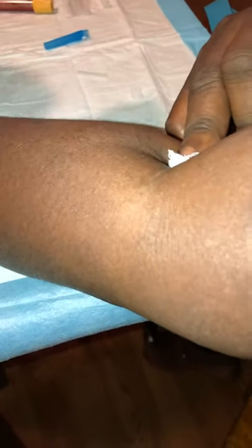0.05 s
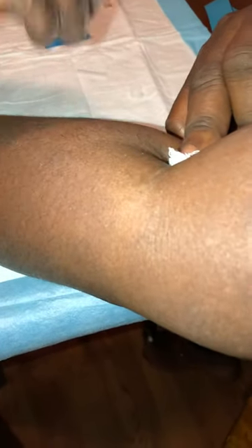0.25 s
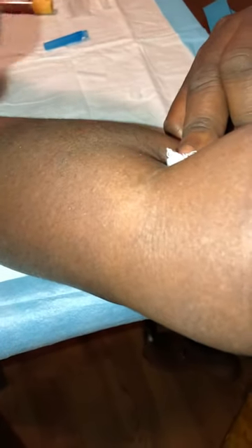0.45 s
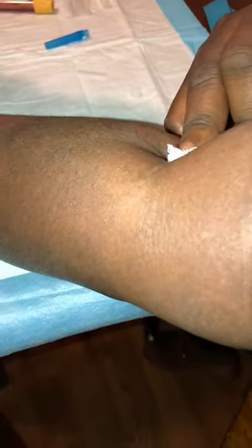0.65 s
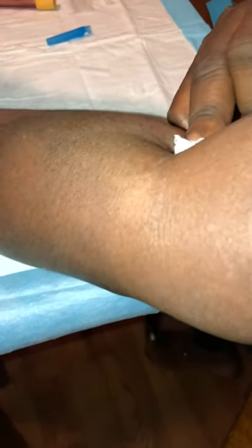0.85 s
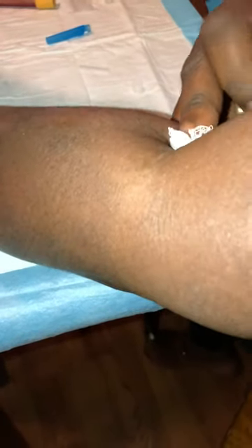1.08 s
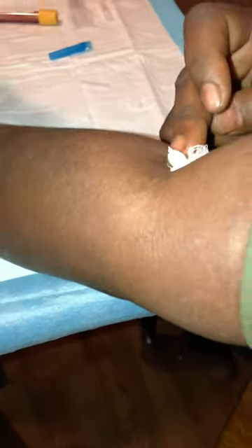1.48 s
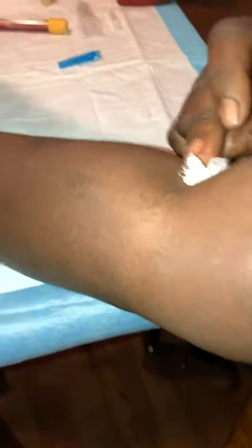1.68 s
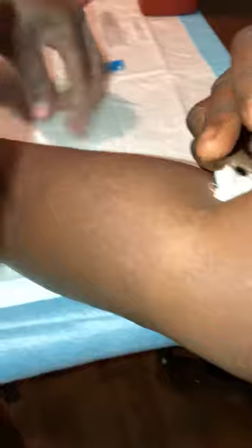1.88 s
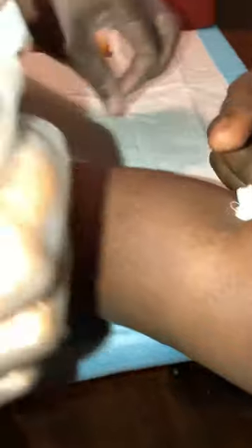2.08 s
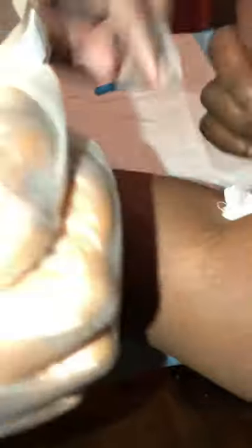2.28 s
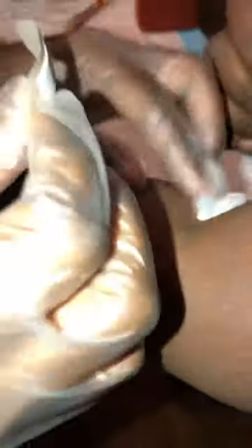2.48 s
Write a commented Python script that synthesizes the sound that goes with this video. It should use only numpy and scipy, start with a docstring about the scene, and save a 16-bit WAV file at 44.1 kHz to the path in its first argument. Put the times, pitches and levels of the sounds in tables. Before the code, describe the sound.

A small plastic item clicks onto a table, followed by faint paper and glove rustling.

```python
"""A plastic item is put down on a table in a small room: it chatters and lands with a sharp click, each
impact exciting the modes of its body. Close by, paper and gloves rustle by friction and snap as their
creases buckle, and something tiny clinks. Reflections from the table and the room follow these sounds.
Beneath them the room rumbles, and a low drone, probably an engine outdoors, climbs slowly in pitch
among faint hums."""
import sys
import numpy as np
from scipy import signal
from scipy.fft import rfft, irfft, next_fast_len
from scipy.io import wavfile
from scipy.ndimage import uniform_filter1d

SR = 44100
rng = np.random.default_rng(int(sys.argv[2]) if len(sys.argv) > 2 else 0)


def persist_wave(psi):
    """Save psi, clipped to +-1, as 16-bit WAV."""
    counts = np.round(np.clip(psi, -1, 1) * 32767).astype(np.int16)
    wavfile.write(sys.argv[1], SR, np.atleast_2d(counts).T)


N = 116865

# spectra of the deep rumble, the room rumble and the air noise: f/Hz, relative density/dB
DEEP_SPECTRUM = [(15, -25), (30, -14), (45, -6), (70, 4.5), (100, -10), (200, -44)]
RUMBLE_SPECTRUM = [(20, -24.5), (45, -14.5), (70, -2), (140, 3.5), (220, -1), (300, -11.5), (450, -20),
                   (900, -52)]
AIR_SPECTRUM = [(150, -31), (250, -2), (319, -2), (400, -11), (519, -6.5), (651, -12.5), (1310, -23.5),
                (4570, -33), (15200, -43.5), (16000, -61)]
# envelopes of the two rumbles and the clearest hum: t/s, level/dB
DEEP_ENVELOPE = [(0, -64), (1.15, -77), (1.3, -62.5), (1.8, -64.5), (2.1, -59), (2.45, -61.5), (2.65, -53)]
RUMBLE_ENVELOPE = [(0, -55.5), (1.1, -55.5), (1.35, -55.5), (1.6, -50.5), (1.85, -53), (2.4, -56),
                   (2.65, -53.5)]
HUM_ENVELOPE = [(0, -62), (0.25, -67), (0.36, -55), (0.58, -57.5), (0.8, -63), (1.25, -65), (1.45, -59),
                (1.75, -62), (2.1, -70.5), (2.45, -62.5), (2.65, -59)]
# faint narrow-band hums: f/Hz, resonator bandwidth/Hz, level/dB
HUM_BANDS = [(199.6, 14, -63), (224.5, 16, -66), (456, 30, -73.5), (513.2, 16, -68.5), (582, 24, -74.5),
             (843, 8, -77.5)]
# course of the engine: t/s, firing rate/Hz, firing tone level/dB, shaft harmonics level/dB
ENGINE_COURSE = [(0, 87.4, -51, -64), (0.55, 88.2, -47.5, -65), (0.8, 91, -45, -69),
                 (1.15, 94.96, -44.5, -73), (1.23, 106, -50.5, -66), (1.35, 111.6, -45, -52),
                 (1.5, 113.7, -43.5, -63), (1.57, 111.5, -50, -57.5), (1.73, 107.3, -60, -68),
                 (1.82, 108.6, -50.5, -71), (1.9, 113.3, -41.5, -57), (2.05, 120.8, -46, -49.5),
                 (2.2, 121.9, -45, -56), (2.4, 122.1, -43, -58), (2.56, 124.9, -55.5, -55.5),
                 (2.65, 127.5, -54, -56)]
# shaft harmonics: multiple of the shaft rate, relative level/dB
SHAFT_HARMONICS = [(2, -0.5), (4, -1.5), (5, -7.5), (8, -12.5)]
# bands of the reverberant tail: f/Hz, T60/s, gain/dB
REVERB_BANDS = [(500, .4, -36), (1500, .36, -12), (3500, 0.48, -13), (4600, 0.44, -13), (5800, 0.35, -15.5),
                (8000, .3, -19), (14000, 0.3, -17)]
# strokes over paper and glove: t/s, duration/s, level/dB, tilt/(dB per octave)
RUSTLE_STROKES = [(0.000, 0.037, -71.5, 0), (0.060, 0.083, -69.5, 0), (0.113, 0.095, -54.5, 1),
                  (0.348, 0.14, -70, 1), (0.498, 0.078, -64, 0), (0.567, 0.062, -61, -0.5),
                  (0.630, 0.032, -59, -1.5), (0.808, 0.011, -64, 3.5), (0.969, 0.038, -68, -2),
                  (1.067, 0.14, -68.5, 2.5), (1.502, .06, -61, -1), (1.569, .018, -55, 2),
                  (1.589, 0.12, -68, 6.5), (1.72, 0.045, -54, 10.5), (1.753, 0.024, -51.5, 1),
                  (1.792, .04, -65, -3), (1.864, 0.036, -57.5, 4.5), (1.943, 0.024, -57, 6.5),
                  (1.988, 0.1, -70.5, 2), (2.162, 0.021, -58, 1), (2.237, 0.16, -68.5, 5.5),
                  (2.452, 0.019, -58.5, -3.5), (2.476, .06, -67, -4)]
# spectrum of the friction noise: f/Hz, relative level/dB
RUSTLE_SPECTRUM = [(300, 8), (900, 1.5), (2000, 0), (4200, 2.5), (7000, -0.5), (11000, -7), (16000, -5.5)]
# light impacts of the tiny part, short when fingers damp it: t/s, level/dB, T60/s
CLINK_IMPACTS = [(0.17, -54.5, .05), (1.304, -59.5, .04), (1.962, -55, .03), (2.3060, -60, .04),
                 (2.319, -51, 0.034), (2.3235, -48.5, 0.072), (2.334, -56, 0.04), (2.5610, -47.5, 0.069)]
# its modes: f/Hz, relative level/dB, fraction of the impact's T60
TINY_PART_MODES = [(7060, -17, .4), (10470, -3, 1), (12410, -2, .9), (15660, -5, .7)]
# snaps of paper and gloves: t/s, level/dB, centre f/Hz, T60/s
CREASE_SNAPS = [(0.0657, -50, 4960, 0.0044), (0.0965, -64, 7000, .004), (0.1393, -44, 6140, 0.0067),
                (0.1408, -43.5, 5000, .006), (0.1705, -49, 8100, .004), (0.58, -46.5, 3250, .008),
                (0.8760, -56.5, 1700, 0.011), (0.9860, -58, 4000, .008), (1.1055, -48, 14100, 0.015),
                (1.165, -59, 8900, 0.0061), (1.1782, -51.5, 7360, .006), (1.2917, -56.5, 9970, .005),
                (1.3020, -55, 9000, 0.0057), (1.5774, -46.5, 11200, 0.0087), (1.5985, -50, 11000, .004),
                (1.6223, -38.5, 4340, 0.011), (1.6555, -62, 12000, .004), (1.6947, -53, 5500, 0.011),
                (1.7249, -32, 12000, .010), (1.7275, -47, 3530, 0.0085), (1.764, -47, 10050, .005),
                (1.7797, -30, 12900, 0.0082), (1.7859, -31.5, 12200, 0.0065), (1.7871, -29.5, 8900, 0.012),
                (1.949, -53, 12000, 0.0058), (1.9540, -55.5, 1960, 0.0089), (2.0014, -52.5, 7360, 0.0084),
                (2.0667, -55.5, 8000, 0.0081), (2.043, -59, 7490, 0.0058), (2.1020, -57.5, 6500, .005),
                (2.1369, -54.5, 7870, .005), (2.1404, -53.5, 11000, 0.0062), (2.2586, -51, 7400, 0.012),
                (2.3553, -53.5, 4470, .005), (2.3695, -52.5, 8000, 0.02), (2.4420, -59.5, 8800, 0.012),
                (2.5430, -54, 5000, 0.0031)]
# soft pitched pops: t/s, level/dB, f/Hz
SOFT_POPS = [(1.6226, -46.5, 2380), (1.7800, -42.5, 2870), (1.7865, -44.5, 885), (1.7875, -51, 1690),
             (2.1528, -48.5, 1450), (2.2945, -55, 2490), (2.3050, -51.5, 4040), (2.3688, -55.5, 1570),
             (2.4625, -55, 3450)]
# the item meets the table: t/s, ring level/dB, crack level/dB, crack tilt/(dB per octave)
PLASTIC_IMPACTS = [(0.2015, -25.5, -28.5, 3), (0.2076, -34, -32, .5), (0.214, -40, -41, 2),
                   (0.2317, -13.5, -20, 0)]
# spectra of its body (peaks near 4.5 and 5 kHz) and of the contact crack: f/Hz, relative level/dB
BODY_SPECTRUM = [(500, -40.5), (2000, -29), (2650, -27.5), (3150, -9), (4000, -4.5), (4480, 4.5),
                 (4750, -6), (5000, 1), (5750, -13.5), (6850, -29.5), (7500, -11.5), (9000, -17),
                 (11800, -22.5), (14700, -20)]
CRACK_SPECTRUM = [(200, 3), (550, 3.5), (850, 8.5), (1400, 2), (2200, -4.5), (4000, 7), (8000, 2.5),
                  (11000, 0.5), (16000, -1)]

TOP_HZ = 16300


def undb(db):
    """Amplitude grows tenfold for every 20 dB."""
    return 10 ** (np.asarray(db) / 20)


def unit(x):
    """Normalisation to an rms of 1."""
    return x / np.sqrt(np.mean(x ** 2) + 1e-30)


def burst(x, db):
    """Energy normalisation: a transient gets the energy of one millisecond at this level."""
    return x * undb(db) * np.sqrt(SR / 1000 / np.sum(x ** 2))


def seconds(length):
    """Uniformly sampled time."""
    return np.arange(int(length * SR)) / SR


def fade(t, t60):
    """Exponential damping: 60 dB in t60 seconds."""
    return np.exp(-np.log(1000) * t / t60)


def noise_decay(t, t60):
    """White noise under exponential damping."""
    return rng.standard_normal(len(t)) * fade(t, t60)


def contour(points):
    """Amplitude envelope, linear in decibels between (t/s, level/dB) points."""
    return undb(np.interp(np.arange(N) / SR, *np.array(points).T))


def add(out, at, x):
    """Superposition of a sound starting at a given time."""
    i = max(int(round(at * SR)), 0)
    out[i:i + len(x)] += x[:max(len(out) - i, 0)]


def colour(x, points, tilt_db=0):
    """Minimum-phase filter through (f/Hz, level/dB) points, tilted per octave above about 1 kHz."""
    size = 2 * next_fast_len(len(x))
    octave = np.log2(np.maximum(np.fft.rfftfreq(size, 1 / SR), 10))
    hz, db = np.array(points, float).T
    gain = undb(np.interp(octave, np.log2(hz), db) + tilt_db * np.maximum(octave - 10, 0))
    cepstrum = irfft(np.log(gain))
    cepstrum[1:size // 2] *= 2  # folding the cepstrum makes the filter causal
    cepstrum[size // 2 + 1:] = 0
    return irfft(rfft(x, size) * np.exp(rfft(cepstrum)))[:len(x)]


def low_cut(x, hz):
    """Second-order high-pass filter."""
    return signal.sosfilt(signal.butter(2, hz, "high", fs=SR, output="sos"), x)


def resonate(x, hz, width):
    """Two-pole resonance with Q = hz / width."""
    return signal.lfilter(*signal.iirpeak(hz, hz / width, fs=SR), x)


def wander(rate):
    """Random modulation: ramps between `rate` values a second, with a spread near 1."""
    hold = int(SR / rate)
    steps = np.repeat(rng.standard_normal(N // hold + 3), hold)
    return 1.2 * uniform_filter1d(steps, hold)[int(rng.random() * hold):][:N]


def rumble(spectrum, envelope):
    """Amplitude modulation: low-frequency noise slowly swells and sinks."""
    return contour(envelope) * unit(colour(rng.standard_normal(N), spectrum))


def air():
    """Stationary broadband noise, weak in the treble."""
    noise = colour(rng.standard_normal(N), AIR_SPECTRUM)
    return undb(-59) * unit(low_cut(noise, hz=220))


def hums():
    """Narrow resonances give noise a pitch; one clearer tone wavers by frequency modulation."""
    faint = np.zeros(N)
    for hz, width, db in HUM_BANDS:
        band = resonate(rng.standard_normal(N), hz, width)
        faint += undb(db) * unit(resonate(band, hz, width))
    clear_hz = 319 * (1 + .009 * wander(rate=14))
    phase = 2 * np.pi * np.cumsum(clear_hz) / SR
    return faint + np.sqrt(2) * contour(HUM_ENVELOPE) * np.sin(phase)


def engine_drone():
    """Periodic excitation heard through walls: three firings to a turn, plus harmonics of the shaft."""
    times, *columns = np.array(ENGINE_COURSE).T
    hz, firing_db, shaft_db = (np.interp(np.arange(N) / SR, times, column) for column in columns)
    firing_phase = 2 * np.pi * np.cumsum(hz) / SR
    shaft_phase = firing_phase / 3
    harmonics = sum(undb(db) * np.sin(order * shaft_phase + rng.uniform(0, 2 * np.pi))
                    for order, db in SHAFT_HARMONICS)
    return np.sqrt(2) * (undb(firing_db) * np.sin(firing_phase) + undb(shaft_db) * harmonics)


def reverberation(x):
    """Reflection: early returns from nearby surfaces, then a diffuse tail that dies sooner in the treble."""
    t = seconds(.6)
    spectrum = rfft(rng.standard_normal(len(t)))
    log_hz = np.log(np.fft.rfftfreq(len(t), 1 / SR) + 1)
    centres = np.log([row[0] for row in REVERB_BANDS])
    decay = lambda t60: fade(t, t60) / np.linalg.norm(fade(t, t60))
    response = undb(-14) * rng.standard_normal(len(t)) * decay(t60=.095)  # early reflections
    for weights, (_, t60, db) in zip(np.eye(len(centres)), REVERB_BANDS):
        band = irfft(spectrum * np.interp(log_hz, centres, weights), len(t))
        response += undb(db) * decay(t60) * band
    out = np.zeros(N)
    add(out, at=.005, x=signal.fftconvolve(x, response))
    return out


def grains(per_s):
    """Shot noise: tiny clicks of uneven size at random times."""
    size = undb(3.6 * np.minimum(rng.exponential(size=N), 5))
    occurs = rng.random(N) < per_s / SR
    return unit(occurs * size * rng.choice([-1, 1], N))


def flicker(x, bands=20, depth_db=5.5):
    """Independent modulation of each narrow band, as the contact moves over the folds."""
    size = next_fast_len(N)
    spectrum = rfft(x, size)
    root_hz = np.sqrt(np.fft.rfftfreq(size, 1 / SR))
    centres = np.linspace(np.sqrt(500), np.sqrt(TOP_HZ), bands)
    out = np.zeros(N)
    for weights in np.eye(bands):
        band = irfft(spectrum * np.interp(root_hz, centres, weights), size)[:N]
        out += band * undb(depth_db * np.minimum(wander(rate=50), 1))
    return unit(out)


def rustles(rub_share=.6, release_s=.013):
    """Friction on paper and glove: each stroke mixes grains of creasing with smooth rubbing."""
    creasing = np.sqrt(1 - rub_share) * grains(per_s=1500)
    rubbing = np.sqrt(rub_share) * rng.standard_normal(N)
    friction = flicker(creasing + rubbing)
    out = undb(-76.5) * unit(colour(grains(per_s=300), RUSTLE_SPECTRUM, tilt_db=-3))  # constant creasing
    for at, length, db, tilt_db in RUSTLE_STROKES:
        stroke = friction[int(at * SR):][:int((length + .1) * SR)]
        t = np.arange(len(stroke)) / SR
        rise = np.minimum(t / (.003 + .19 * length), 1)
        release = np.exp(-np.maximum(t - length, 0) / release_s)
        add(out, at, undb(db) * rise * release * unit(colour(stroke, RUSTLE_SPECTRUM, tilt_db)))
    return out


def clinks():
    """Free vibration: a tiny hard part scrapes and rings in high, damped modes."""
    out, t = np.zeros(N), seconds(.15)
    for at, db, t60 in CLINK_IMPACTS:
        scrape = resonate(noise_decay(t, t60=.02), hz=11000, width=7000)
        ring = sum(undb(mode_db) * fade(t, share * t60) * np.cos(2 * np.pi * hz * t)
                   for hz, mode_db, share in TINY_PART_MODES)
        add(out, at, undb(db) * (ring + burst(scrape, db=-4)))
    return out


def pops():
    """Damped oscillation at a single frequency makes each soft pop."""
    out, t = np.zeros(N), seconds(.04)
    for at, db, hz in SOFT_POPS:
        add(out, at, burst(np.sin(2 * np.pi * hz * t) * fade(t, t60=.018), db))
    return out


def snaps():
    """Buckling of a crease: milliseconds of crackle in a broad resonance with a narrower ring inside."""
    out, t = np.zeros(N), seconds(.04)
    for at, db, hz, t60 in CREASE_SNAPS:
        crackle = resonate(noise_decay(t, t60), hz, width=.73 * hz)
        ring = undb(-1) * resonate(crackle, hz, width=.2 * hz)
        add(out, at, burst(low_cut(crackle + ring, hz=880), db))
    return out


def plastic_item(contact_s=.00008):
    """Impact excitation: each contact cracks and rings the body, whose two close resonances beat."""
    out, t = np.zeros(N), seconds(.05)
    build_up = 1 - np.exp(-t / contact_s)
    ring = colour(signal.unit_impulse(len(t)), BODY_SPECTRUM) * build_up
    ring = low_cut(ring, hz=2000)  # a small body radiates no bass
    for at, ring_db, crack_db, tilt_db in PLASTIC_IMPACTS:
        crack = colour(noise_decay(t, t60=.0078), CRACK_SPECTRUM, tilt_db)
        add(out, at, burst(ring, ring_db) + burst(crack, crack_db))
    return out


def scene():
    """Superposition of the direct handling sounds, their reflections and the background, in mono."""
    direct = plastic_item() + snaps() + pops() + clinks() + rustles()
    reflected = reverberation(direct)
    background = engine_drone() + rumble(RUMBLE_SPECTRUM, RUMBLE_ENVELOPE) + air() + hums()
    background += rumble(DEEP_SPECTRUM, DEEP_ENVELOPE)
    return (direct + reflected + background)[None]


def record(dry):
    """Band limiting: a steep low-pass filter removes the highest treble."""
    return signal.sosfilt(signal.ellip(8, .2, 70, TOP_HZ, fs=SR, output="sos"), dry)


dry = scene()
out = record(dry)
persist_wave(out)
```